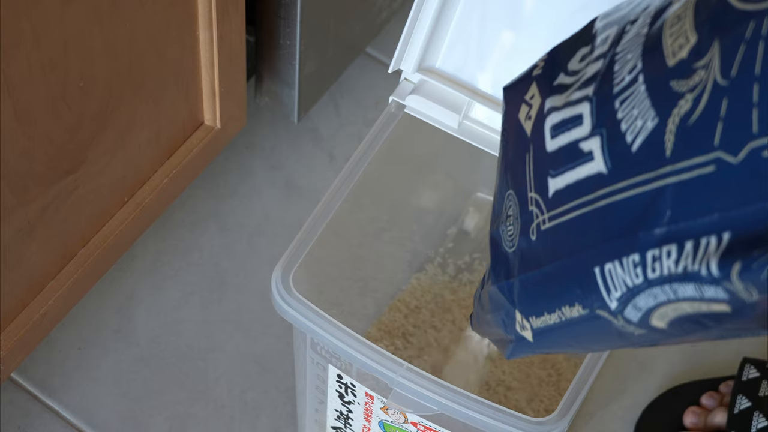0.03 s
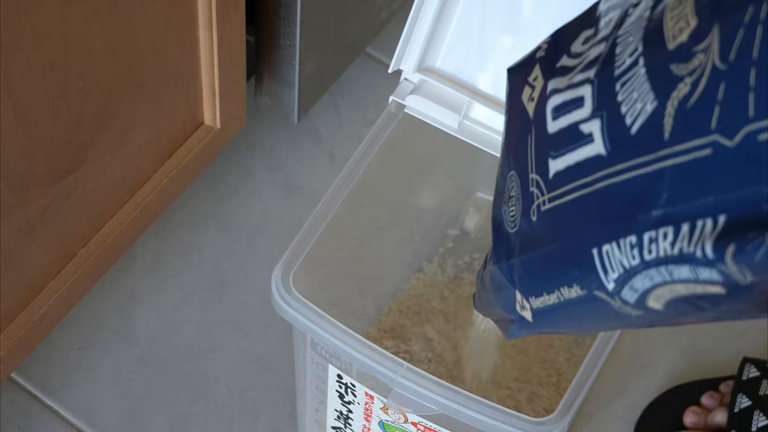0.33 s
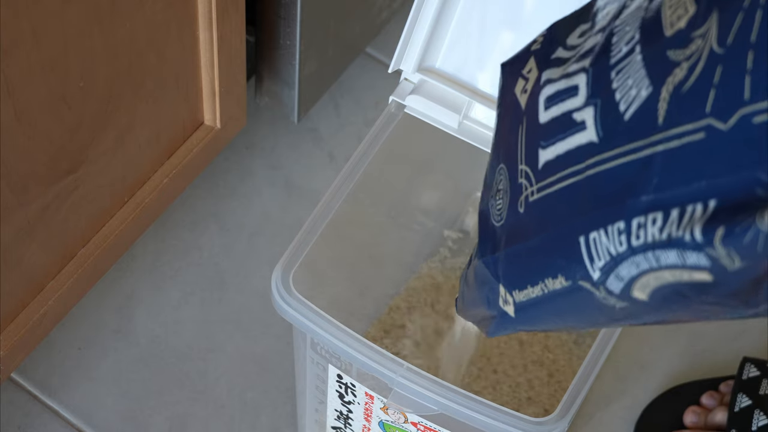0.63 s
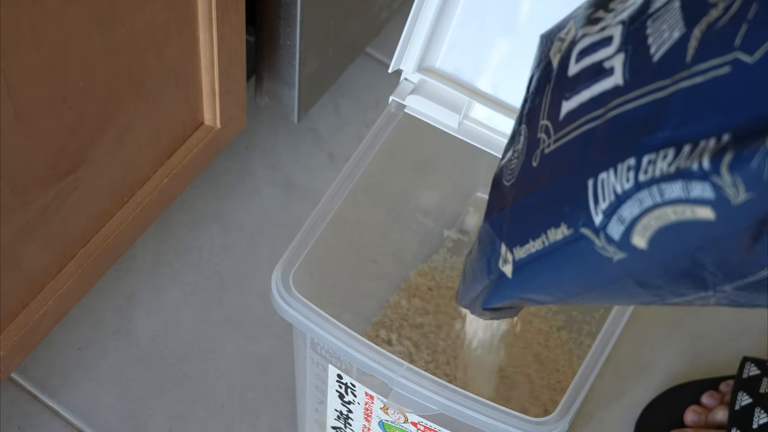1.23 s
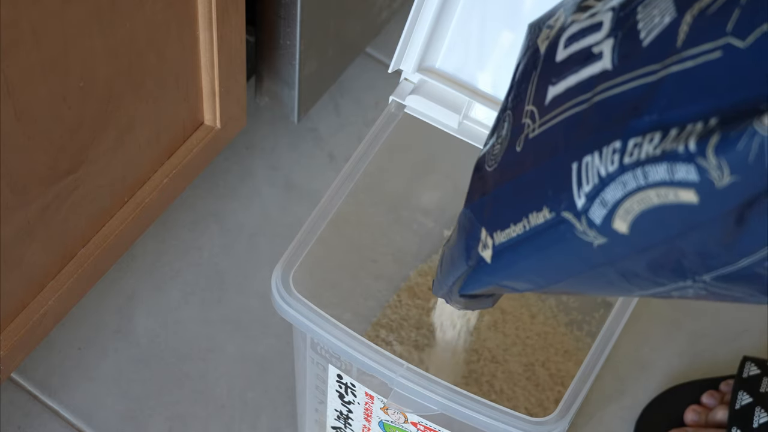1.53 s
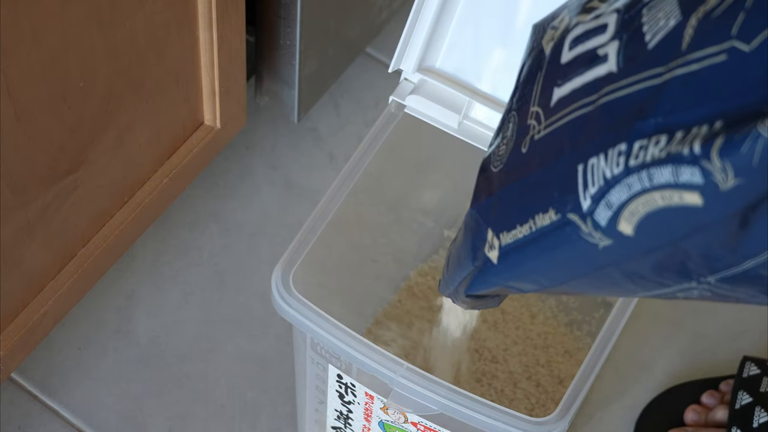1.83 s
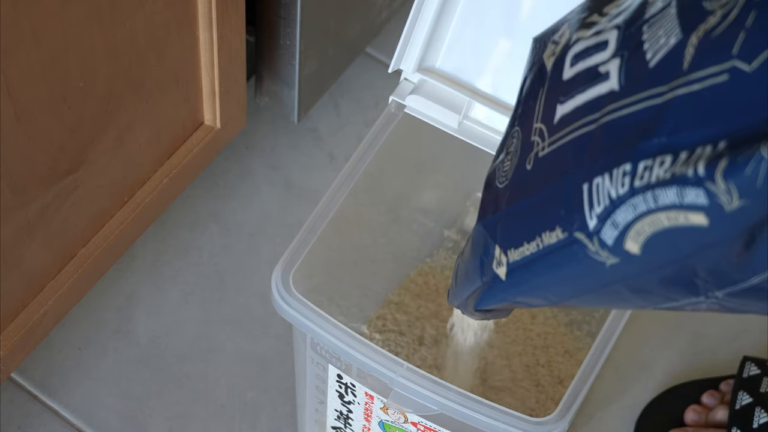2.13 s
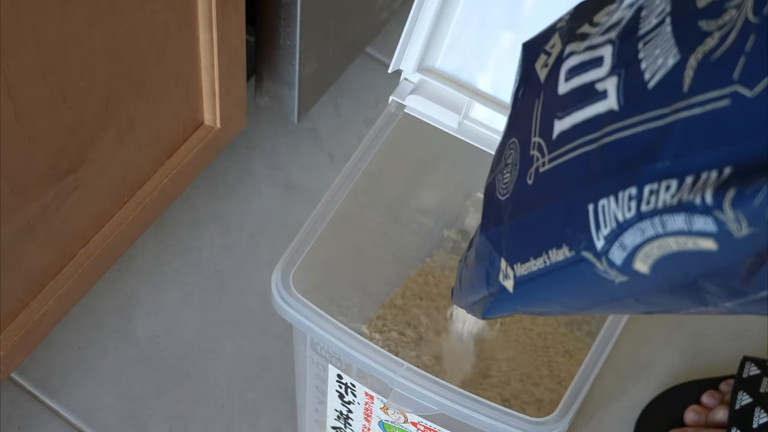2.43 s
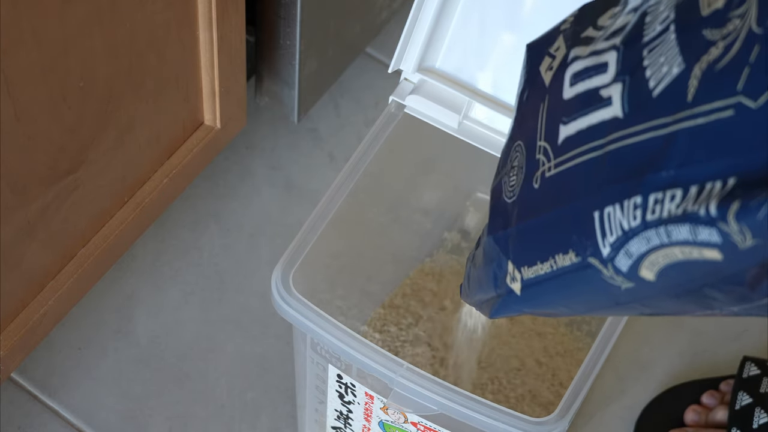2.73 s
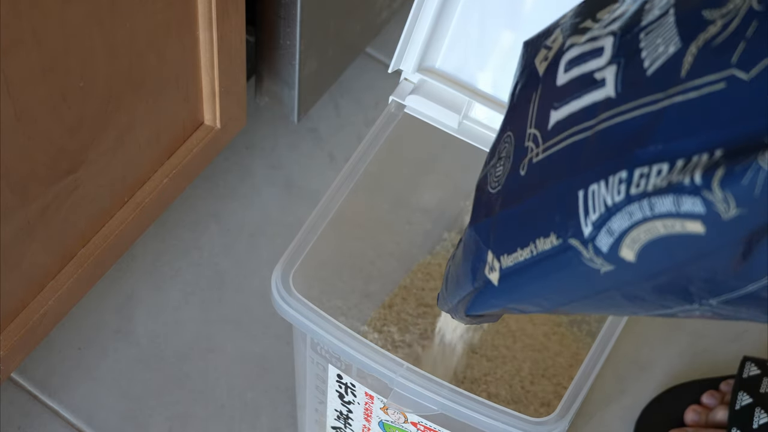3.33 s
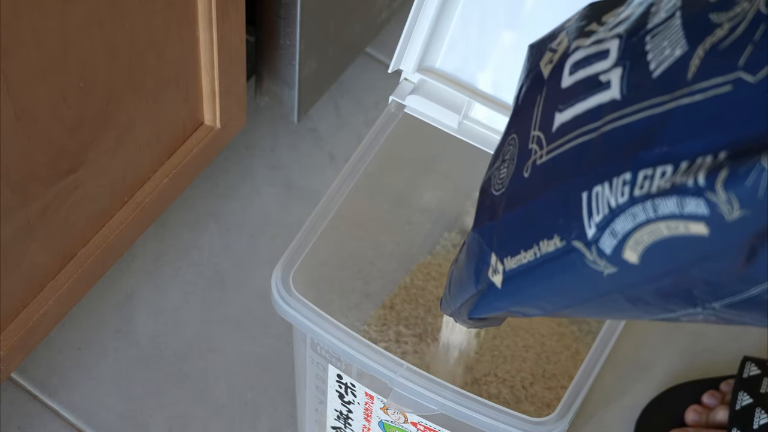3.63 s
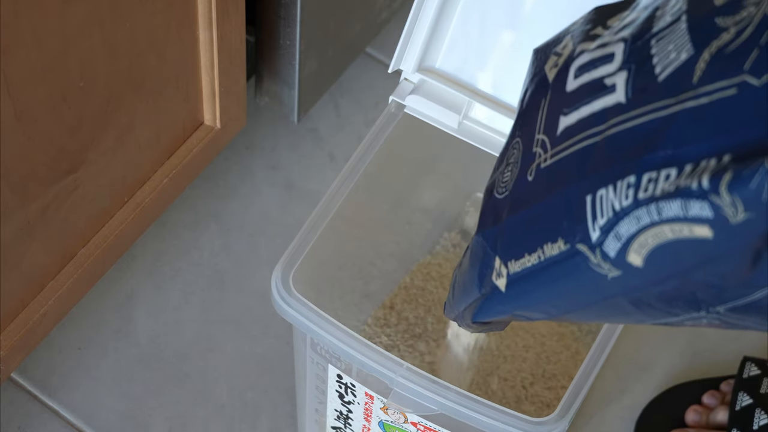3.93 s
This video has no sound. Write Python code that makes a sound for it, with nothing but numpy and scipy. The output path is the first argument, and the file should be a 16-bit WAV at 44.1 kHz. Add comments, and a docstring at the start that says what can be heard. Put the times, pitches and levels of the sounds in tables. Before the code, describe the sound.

Rice pours into a plastic bin for all four seconds, a close hiss with low patter and bright ticks of bouncing grains, slowly growing louder. The plastic sack crackles at the start and again from about 0.7 to 1.2 seconds. Near 2.8 seconds it buckles with a dull thump, followed by a sharp snap around 3.3 and a few small pops. An appliance hums faintly under the kitchen's low rumble.

```python
"""Rice runs from the cut corner of a plastic sack onto the heap in a plastic bin, in a small kitchen.
Thousands of tiny hits blend into a hiss over a low patter, and grains tick brightly as they bounce.
The sack's creases snap as it empties. Once its wall buckles with a dull thump and the rice inside
settles. An appliance hums behind it all, over the low rumble of the room."""
import sys
import numpy as np
from scipy import signal
from scipy.fft import rfft, irfft
from scipy.io import wavfile

SR = 44100
rng = np.random.default_rng(int(sys.argv[2]) if len(sys.argv) > 2 else 0)


def store_wav(level_fs):
    """Save 16-bit WAV to argv[1]."""
    pcm = np.round(np.clip(np.atleast_2d(level_fs), -1, 1) * 32767)
    wavfile.write(sys.argv[1], SR, pcm.T.astype(np.int16))


N = 176400
T = np.arange(N) / SR

# how the bright ticking rises and falls: t/s, level/dB
TICK_LEVELS = [(0, -76), (.45, -66), (.53, -59), (.7, -64), (.79, -56), (.9, -72), (1.02, -60),
               (1.45, -62.5), (1.57, -56), (1.8, -57), (1.9, -54.5), (2.2, -61), (2.85, -62), (2.97, -58),
               (3.32, -60.5), (3.45, -52.5), (3.62, -55.3), (4, -57.5)]
# ring of a bouncing grain: f/Hz, level/dB
BOUNCE_TONE = [(800, -20), (2500, -8), (5000, 7), (7000, -4), (8500, 3), (10300, -6.5), (12200, 0.5),
               (13500, -10), (15500, -2.5)]
GRAINS_PER_S, GRAIN_SPREAD_DB = 9000, 2.5


def from_db(db):
    """Turn decibels into a number to multiply a sound by."""
    return 10 ** (np.asarray(db) / 20)


def rms_one(x):
    """Scale a sound so that its average strength (rms) is 1."""
    return x / np.sqrt(np.mean(x ** 2) + 1e-20)


def peak_one(x):
    """Scale a sound so that its highest peak is 1."""
    return x / np.max(np.abs(x))


def curve(rows):
    """Join rows of (time, value) with straight lines."""
    return np.interp(T, *np.transpose(rows))


def dying(t60):
    """A fade that starts at 1 and falls by 60 dB in t60 seconds, the fade time."""
    return np.exp(-np.minimum(np.log(1000) * T / t60, 50))


def at(start_s, x):
    """Delay a sound so that it begins at start_s."""
    return np.concatenate([np.zeros(max(int(start_s * SR), 0)), x])[:N]


def drift(rate_hz):
    """A slow random wander, about 1 in size."""
    pole = np.exp(-2 * np.pi * rate_hz / SR)
    wander = signal.lfilter([1], [1, -2 * pole, pole * pole], rng.standard_normal(N + SR))
    return rms_one(wander[SR:])


def colour(x, tone, size=8192):
    """Make a sound's lows and highs louder or softer, following rows of (frequency, level)."""
    hz, db = np.transpose(tone)
    bins_hz = np.maximum(np.fft.rfftfreq(size, 1 / SR), 1)
    gains = from_db(np.interp(np.log(bins_hz), np.log(hz), db))
    # minimum phase: the ring comes after each hit, never before it
    cepstrum = irfft(np.log(gains))
    cepstrum[1:size // 2] *= 2
    cepstrum[size // 2 + 1:] = 0
    ring = irfft(np.exp(rfft(cepstrum)))
    return signal.fftconvolve(x, ring)[:N]


def mode(hz, t60):
    """One pure note of a struck object, fading away."""
    return np.sin(2 * np.pi * hz * T) * dying(t60)


def moments(per_s):
    """Mark random instants, on average per_s of them a second."""
    return rng.random(N) < per_s / SR


def impacts(per_s, spread_db):
    """Random clicks, many small and a few large."""
    sizes = from_db(spread_db * np.minimum(rng.exponential(1, N), 3.7))
    return sizes * rng.choice([-1, 1], N) * moments(per_s)


def shower(level_db, tone, per_s, spread_db, surge_db):
    """Grains land in an uneven stream; the stronger it runs, the more hits there are each second."""
    power = from_db(level_db + surge_db * drift(rate_hz=22)) ** 2
    hits = impacts(per_s * power / power.mean(), spread_db)
    return np.sqrt(power.mean()) * rms_one(colour(hits, tone))


def flurries(per_s=56, t60=.03):
    """Grains bounce in flurries: a curve around 0 that jumps up at random and quickly falls back."""
    starts = moments(per_s) * rng.uniform(.5, 1, N)
    swell = signal.fftconvolve(starts, dying(t60))[:N]
    return rms_one(swell - swell.mean())


def heap_hiss(flurry):
    """The stream hisses on the heap, and its tone changes as the rice gets deeper."""
    # strength of the stream: t/s, level/dB
    flow = [(0, -51), (.2, -51.5), (.45, -52), (.6, -50), (1.05, -49.3), (1.3, -47.5), (1.5, -48),
            (1.7, -47.5), (1.9, -46), (2.15, -47.5), (2.3, -47.5), (2.55, -48), (2.84, -47.5), (3.1, -45),
            (3.32, -47.5), (3.42, -44), (3.7, -45.5), (3.85, -44), (4, -44.5)]
    # grains that land on deep rice: t/s, share/0-1
    fill = [(0, 0.15), (.7, 0.63), (1.5, 1), (3, 0.8), (4, 1)]
    # ring of a grain landing on the shallow heap: f/Hz, level/dB
    shallow_tone = [(300, -16), (700, -4.5), (1050, -7.5), (1550, 1.5), (1770, -0.5), (1900, 4),
                    (2180, -10), (2500, -1.5), (3250, -2.5), (3800, -5), (4150, -7.5), (4650, -8.5),
                    (5400, -8.5), (6000, -11.5), (7400, -17), (8300, -14.5), (9500, -21), (11000, -21.5),
                    (16000, -19)]
    # ring of a grain landing on the deep heap: f/Hz, level/dB
    deep_tone = [(300, -14), (700, -6), (1050, -7.5), (1400, -3), (1580, -1.5), (1700, -0.5), (1880, 0),
                 (2060, -2), (2180, 3.5), (2290, -1.5), (2370, 1.3), (2520, -2), (2840, -1.5), (2960, -3.5),
                 (3250, -0.5), (3850, -4.5), (4150, 0.5), (4600, -4.5), (5450, -5), (6000, -8.5),
                 (7400, -12.5), (8300, -12), (9500, -17.5), (11000, -18.5), (16000, -17.5)]
    level_db = curve(flow) + 1 + 0.26 * flurry
    deep = curve(fill)
    return sum(np.sqrt(share) * shower(level_db, tone, GRAINS_PER_S, GRAIN_SPREAD_DB, surge_db=0.97)
               for share, tone in [(1 - deep, shallow_tone), (deep, deep_tone)])


def ticks(flurry):
    """Bouncing grains tick brightly, more of them in each flurry."""
    level_db = curve(TICK_LEVELS) - 2.5 + 2 * flurry
    return shower(level_db, BOUNCE_TONE, per_s=2600, spread_db=3.5, surge_db=1.3)


def patter():
    """The heap and the bin boom softly under the falling grains."""
    # how the patter rises and falls: t/s, level/dB
    levels = [(0, -54), (.7, -57), (1.1, -52), (2.2, -54), (2.8, -49.5), (3.1, -50.5), (3.55, -53),
              (3.75, -49), (4, -48)]
    # boom of the heap and bin: f/Hz, level/dB
    boom_tone = [(90, -15), (170, -9), (240, 2.5), (285, -1.5), (345, 2.5), (410, -2.5), (460, -1),
                 (550, -7.5), (750, -9.5), (1200, -11), (3000, -64)]
    return shower(curve(levels) - 2.5, boom_tone, per_s=1200, spread_db=2, surge_db=0.85)


def stray_grains(per_s=75, range_db=9):
    """Lone grains jump off the heap and click on the wall, each with a tiny rattle."""
    # ring of a lone grain on the wall: f/Hz, level/dB
    stray_tone = [(2000, -22), (6000, -8), (8300, 1.5), (10000, -3.5), (12000, 1.5), (15500, 0.5)]
    clicks = moments(per_s) * from_db(-range_db * rng.random(N))
    rattles = signal.fftconvolve(clicks, dying(t60=0.0065))[:N] * rng.standard_normal(N)
    return from_db(curve(TICK_LEVELS) - 3) * rms_one(colour(rattles, stray_tone))


def hum_and_rumble(waver_db=0.55, rise_db_per_s=1.5):
    """An appliance hums and the room rumbles, both slowly growing louder."""
    # notes of the hum, halfway through the scene: f/Hz, level/dB
    hum_notes = [(120, -54), (202, -70.5), (240, -65)]
    # tone of the room's rumble: f/Hz, level/dB
    rumble_tone = [(15, -19), (35, -13), (55, 1), (75, 0.5), (100, -3), (160, -6), (400, -10.5),
                   (2000, -40.5), (16000, -31)]
    hum = np.zeros(N)
    for hz, db in hum_notes:
        strength = np.sqrt(2) * from_db(db + waver_db * drift(rate_hz=3.2))
        hum += strength * np.sin(2 * np.pi * (hz * T + rng.random()))
    rumble = from_db(-57.5) * rms_one(colour(rng.standard_normal(N), rumble_tone))
    return (hum + rumble) * from_db(rise_db_per_s * (T - T.mean()))


def creases():
    """Each crease snaps, makes a patch of the sack ring with a pop, and leaves a brief flutter."""
    # creases giving way: t/s, pop level/dB, pop f/Hz, pop fade time/s,
    # overtones against the pop/dB, snap level/dB, flutter level/dB
    crease_events = [(0.0427, -33.5, 500, .011, -12, -57, -51), (0.0593, -34, 706, .0075, -3, -31, -40.5),
                     (0.0767, -34, 1950, 0.009, -4, -25.5, -45), (0.0825, -40, 1430, .008, -7, -27, -34),
                     (0.138, -41, 425, 0.014, 2, -55, -55), (.7412, -29.5, 2130, .0091, -11, -50, -49),
                     (0.8207, -32.5, 1480, .012, -20, -52, -49), (0.822, -39, 440, 0.015, -8, -57, -46),
                     (0.8364, -30, 625, .014, 0, -54, -41), (0.8384, -39.5, 865, 0.06, -4, -54, -50),
                     (0.8957, -34, 890, 0.0076, -3, -47, -47), (.932, -34.5, 256, 0.024, -13, -55, -56),
                     (1.121, -31, 1830, 0.0078, -20, -48, -56),
                     (1.1776, -26.5, 860, 0.023, -7.5, -30, -35.5),
                     (1.816, -34.5, 470, 0.018, -12, -55, -52), (1.88, -35.5, 4900, .014, -20, -45, -45),
                     (2.631, -38.5, 203, 0.034, -3, -48, -42), (2.827, -36, 1130, 0.042, -15, -44, -39),
                     (3.011, -33, 500, 0.012, -12, -55, -51), (3.141, -35.5, 560, 0.015, -10, -55, -50),
                     (3.251, -31, 600, .0043, -8, -20.5, -56), (3.658, -39.5, 363, 0.1, -18, -55, -58),
                     (3.768, -34, 390, .035, -24, -55, -56), (3.827, -32, 1960, .018, -20, -48, -45)]
    # higher notes of a pop: f/times the pop's, level/dB, fade time/times the pop's
    overtones = [(2.05, -1.5, 0.75), (2.55, 1, .5), (3.2, 0.5, 0.29)]
    # tone of a sharp snap: f/Hz, level/dB
    snap_tone = [(200, -8), (900, 0), (2300, 12), (4500, 0.5), (7000, 4), (8800, 3), (10800, -23),
                 (16000, -34)]
    # tone of the fluttering plastic: f/Hz, level/dB
    flutter_tone = [(150, -18), (600, 4.5), (2000, -5.5), (3800, -0.5), (6000, -10.5), (9000, -31),
                    (16000, -35)]
    click = 1.0 * (T == 0)
    snap = peak_one(colour(click, snap_tone))
    flutter = rms_one(colour(rng.standard_normal(N), flutter_tone))
    flutter_fade = dying(t60=.028)
    sack = np.zeros(N)
    for start_s, pop_db, hz, t60, overtone_db, snap_db, flutter_db in crease_events:
        crunch = sum((-1) ** (k + 1) * from_db(db) * mode(ratio * hz, share * t60)
                     for k, (ratio, db, share) in enumerate(overtones))
        pop = mode(hz, t60) + from_db(overtone_db) * crunch
        sack += at(start_s, from_db(pop_db) * pop + from_db(snap_db) * snap)
        sack += at(start_s, from_db(flutter_db) * flutter_fade) * flutter
    return sack


def spatters():
    """Clumps of grains land together on the plastic in short, bright bursts."""
    # clumps landing: t/s, peak level/dB
    clumps = [(.26, -39), (.365, -39), (.535, -43), (.631, -38), (.783, -42), (1.496, -36), (1.547, -36),
              (1.641, -33), (1.72, -41), (1.776, -40), (1.879, -39), (1.921, -33), (2.086, -39),
              (2.733, -48), (2.898, -44), (2.98, -35), (3.48, -32.5), (3.612, -31), (3.723, -41),
              (3.906, -39)]
    bursts = np.zeros(N)
    for start_s, db in clumps:
        hits = impacts(GRAINS_PER_S, GRAIN_SPREAD_DB) * dying(t60=0.033)
        bursts += at(start_s, from_db(db) * peak_one(colour(hits, BOUNCE_TONE)))
    return bursts


def thump(start_s=2.8248, low_hz=170, high_hz=692):
    """The sack's wall flips with a soft thump and a thin knock; the rice behind it stops the ring."""
    # notes of the sack's wall: f/Hz, level/dB, fade time/s
    wall_notes = [(138, -29, 0.022), (290, -9, 0.01), (471, 3.5, 0.01), (733, -3, 0.021)]
    ring = sum((-1) ** (k + 1) * from_db(db) * mode(hz, t60)
               for k, (hz, db, t60) in enumerate(wall_notes))
    dull = signal.sosfilt(signal.butter(8, high_hz, fs=SR, output="sos"), ring)
    thud = signal.sosfilt(signal.butter(2, low_hz, "high", fs=SR, output="sos"), dull)
    knock = mode(hz=1520, t60=0.037)
    direct = from_db(-11) * peak_one(thud) + from_db(-38) * knock
    floor_echo = from_db(-16) * at(0.00434, direct)
    return at(start_s, direct + floor_echo)


def settling():
    """A soft, low rush comes each time the rice in the sack shifts."""
    # shifts of the rice: t/s, level/dB, rise time/s
    shifts = [(2.8248, -49, 0.0059), (3.73, -51, .07)]
    # tone of rice moving inside the sack: f/Hz, level/dB
    rush_tone = [(25, -18), (70, 12), (200, -1), (650, -24), (1200, -17), (4000, -52)]
    rush = rms_one(colour(impacts(GRAINS_PER_S, GRAIN_SPREAD_DB), rush_tone))
    swells = sum(at(start_s, from_db(db) * np.minimum(T / rise_s, 1) * dying(t60=0.77))
                 for start_s, db, rise_s in shifts)
    return rush * swells


def kitchen_echoes(x, first_echo_s=.004, t60=0.35, level_db=-20):
    """The kitchen throws the sound back as many close echoes that die away."""
    tail = at(first_echo_s, rng.standard_normal(N) * dying(t60))
    return from_db(level_db) * signal.fftconvolve(x, tail / np.linalg.norm(tail))[:N]


def scene():
    """The rice, the sack and the kitchen, heard from one spot: both channels are the same."""
    flurry = flurries()
    rice = heap_hiss(flurry) + ticks(flurry) + patter() + stray_grains() + spatters()
    near = rice + creases() + thump() + settling()
    mono = near + kitchen_echoes(near) + hum_and_rumble()
    return np.array([mono, mono])


def record(dry):
    """Cut away the very highest treble."""
    cutoff_hz = 15720
    return signal.sosfilt(signal.ellip(12, .1, 70, cutoff_hz, fs=SR, output="sos"), dry)


dry = scene()
out = record(dry)
store_wav(out)
```